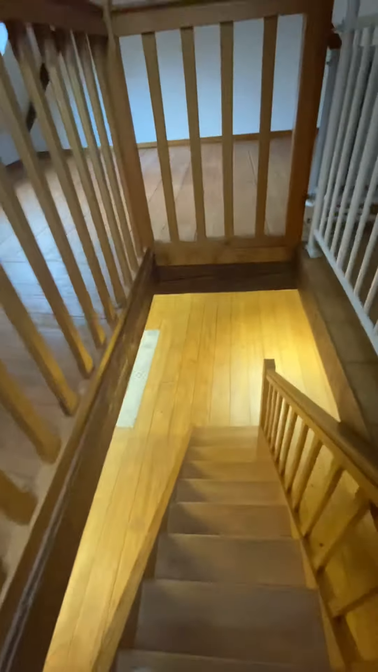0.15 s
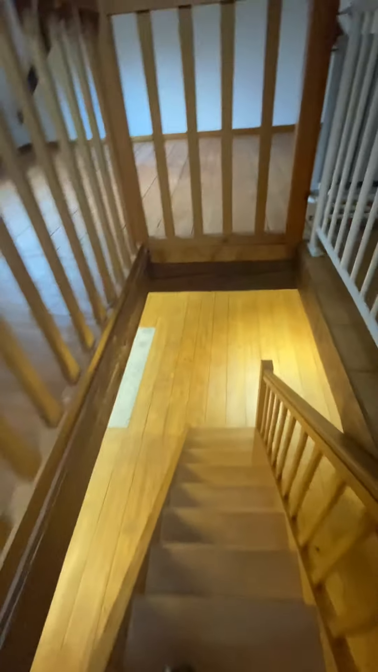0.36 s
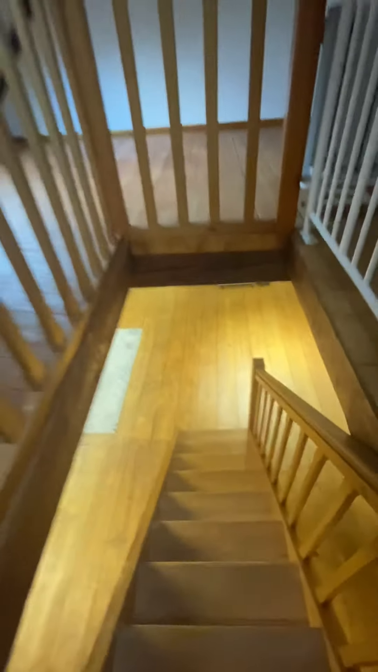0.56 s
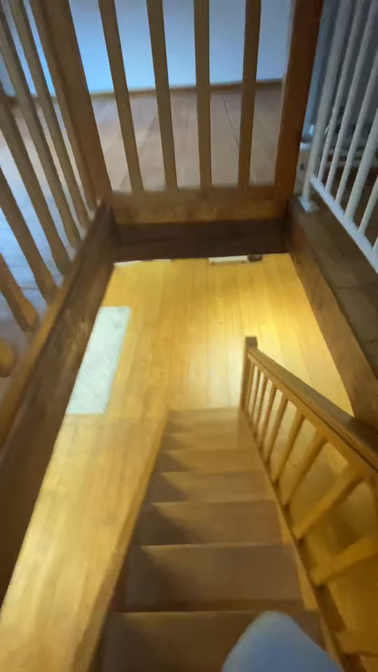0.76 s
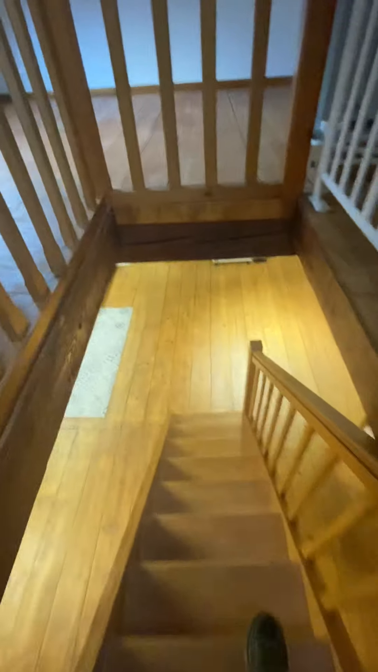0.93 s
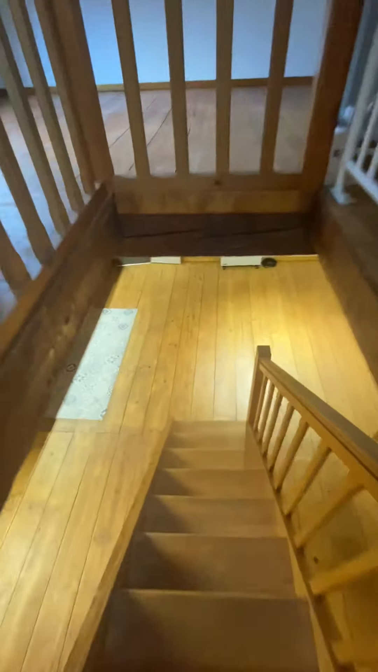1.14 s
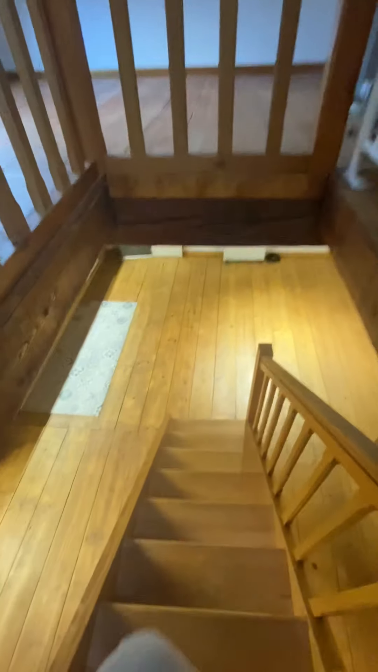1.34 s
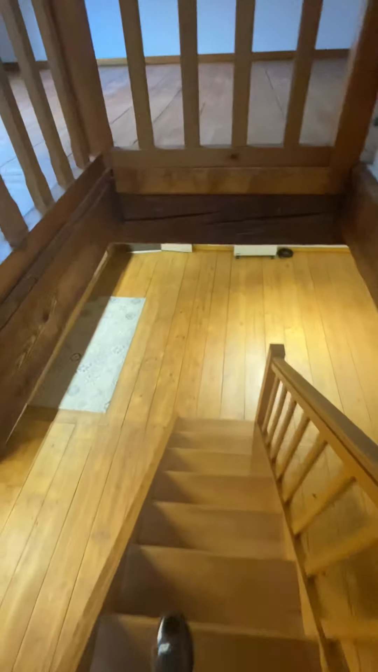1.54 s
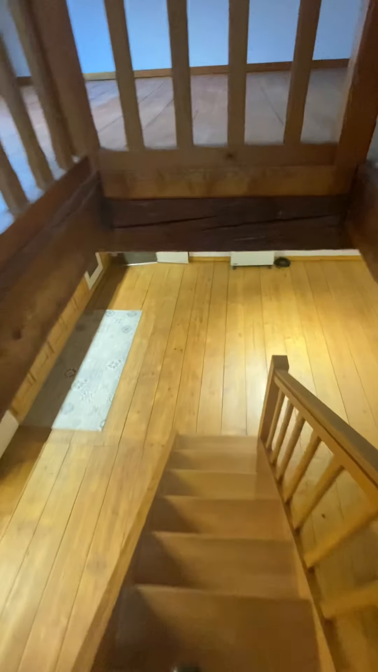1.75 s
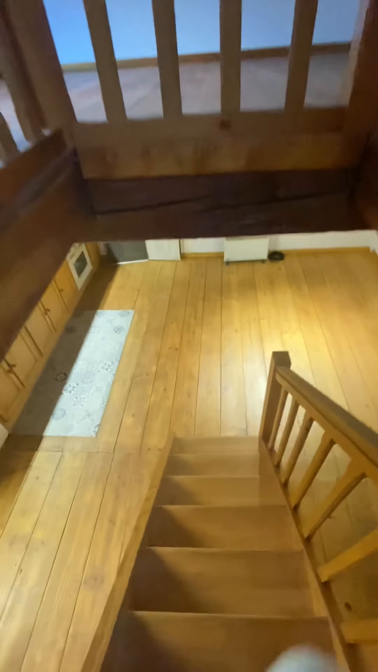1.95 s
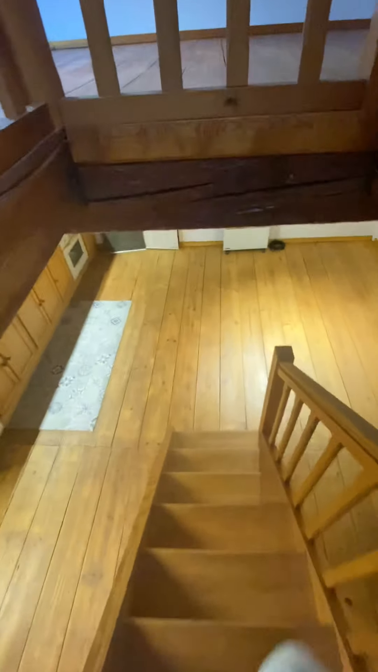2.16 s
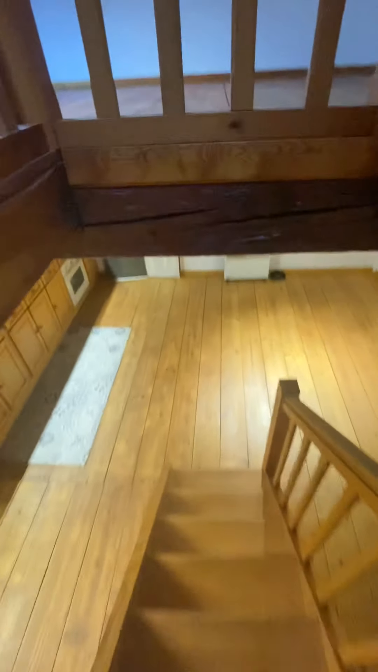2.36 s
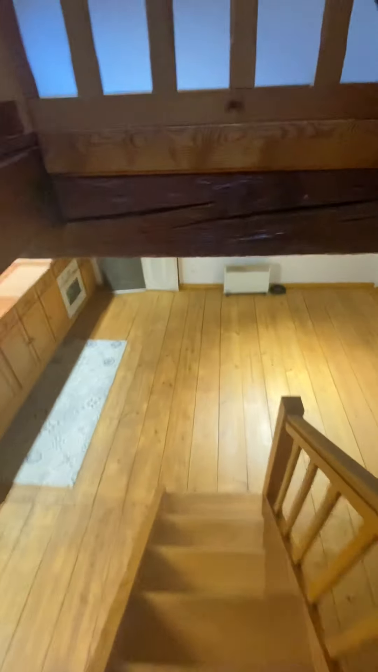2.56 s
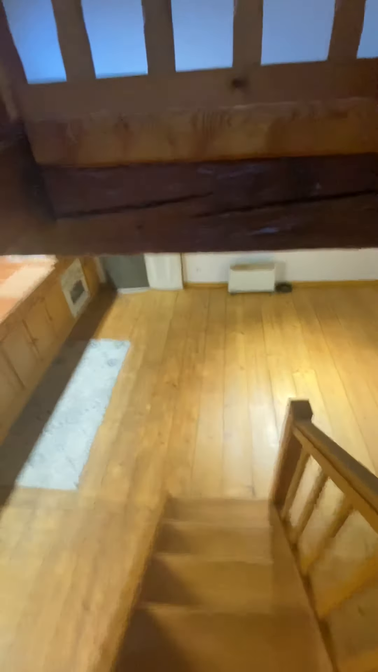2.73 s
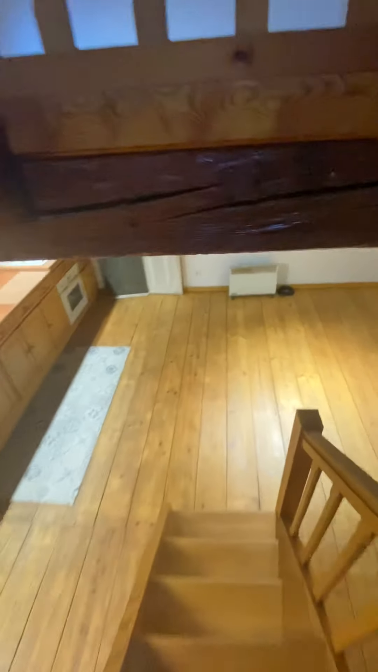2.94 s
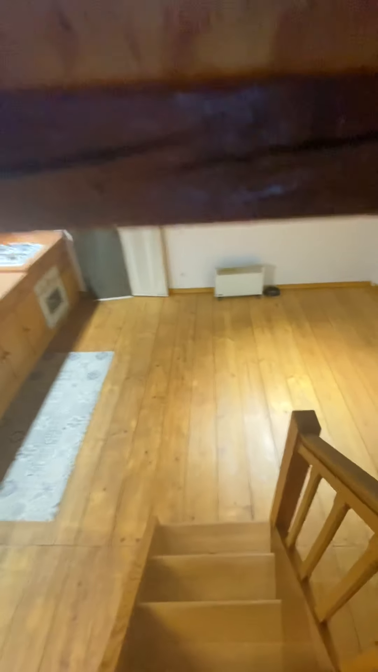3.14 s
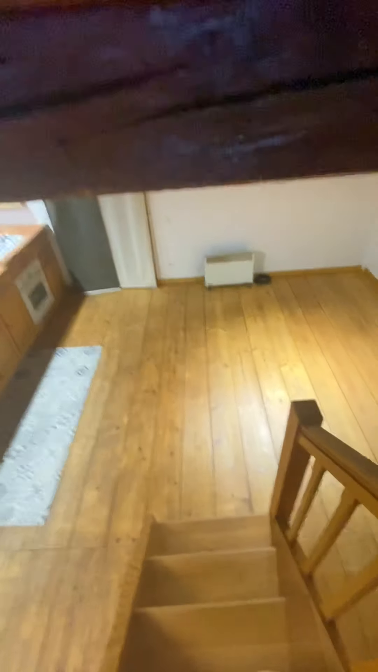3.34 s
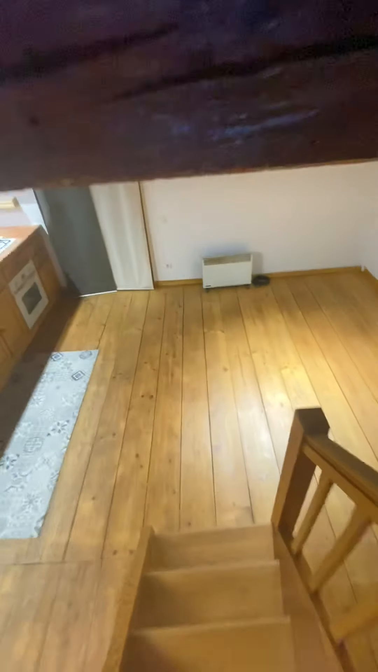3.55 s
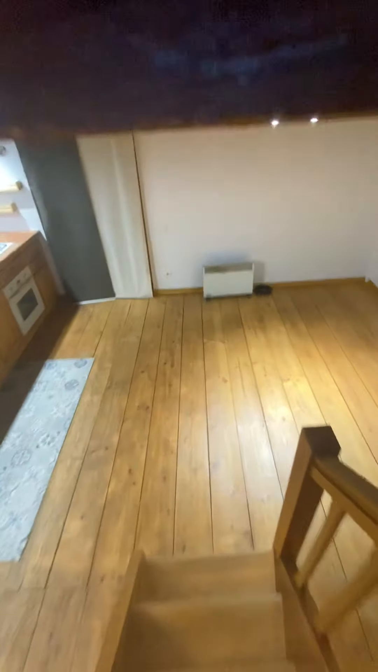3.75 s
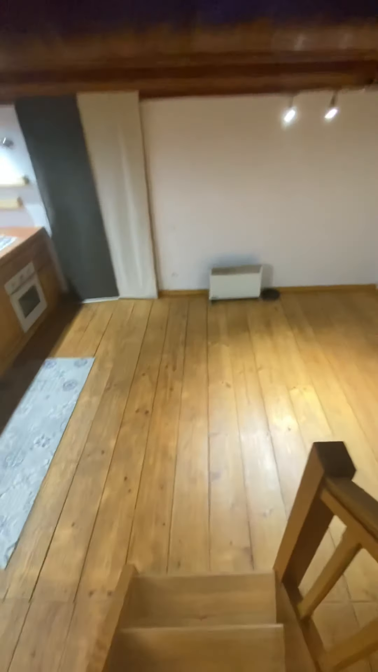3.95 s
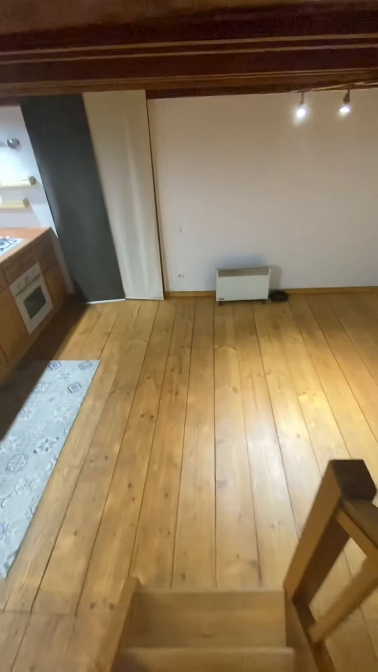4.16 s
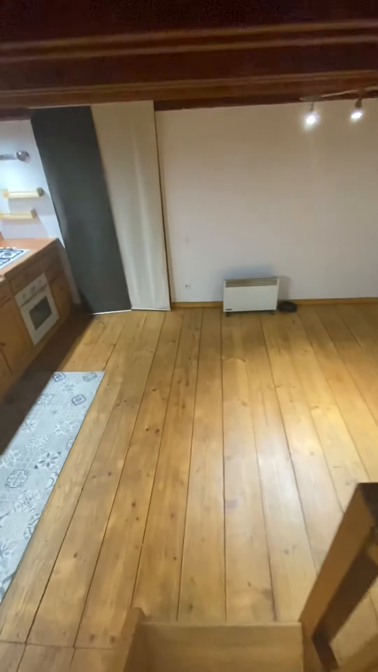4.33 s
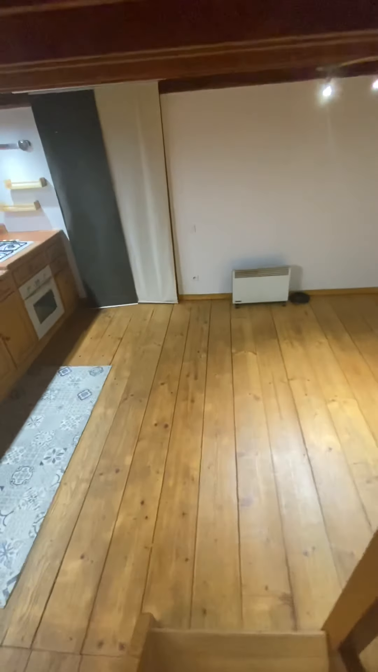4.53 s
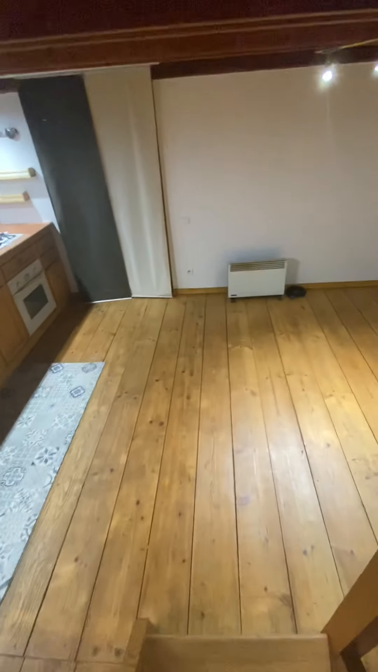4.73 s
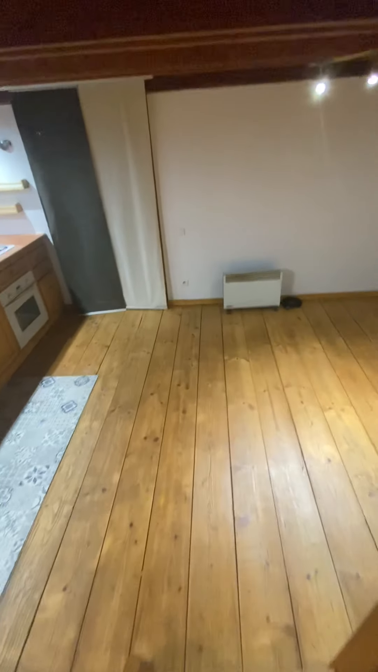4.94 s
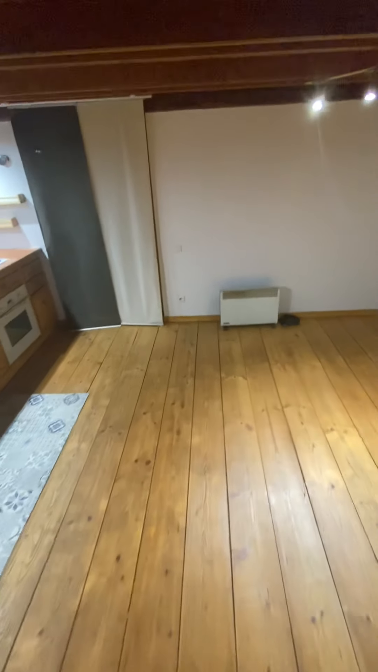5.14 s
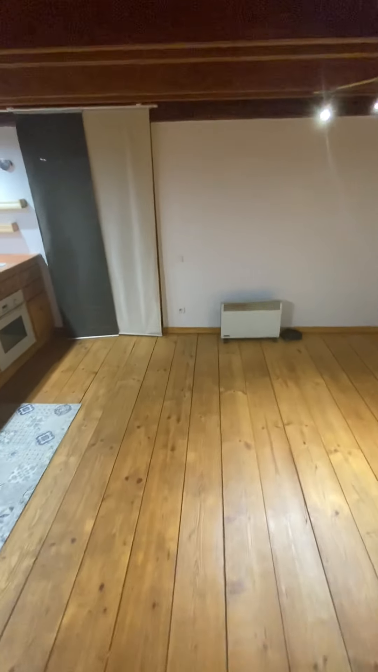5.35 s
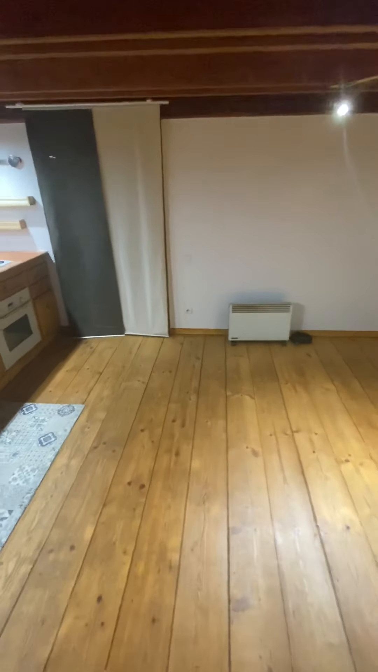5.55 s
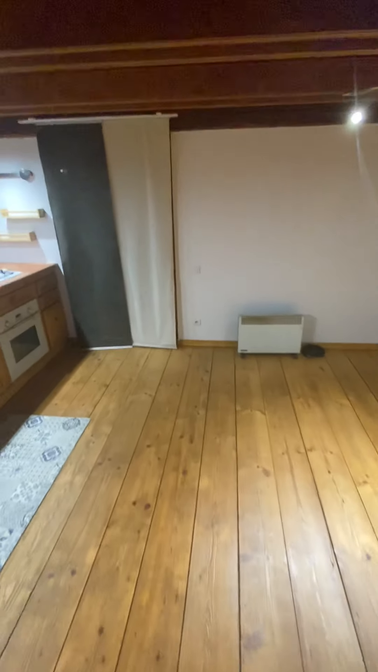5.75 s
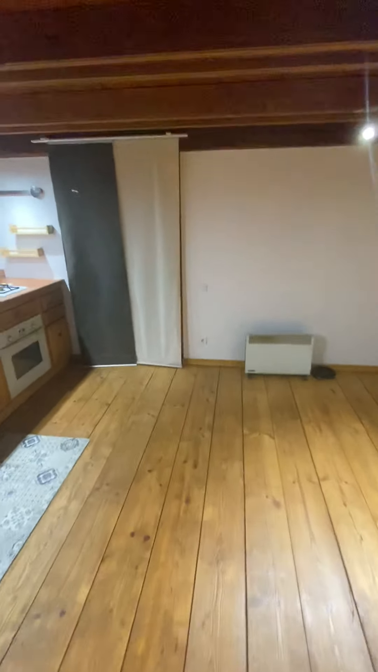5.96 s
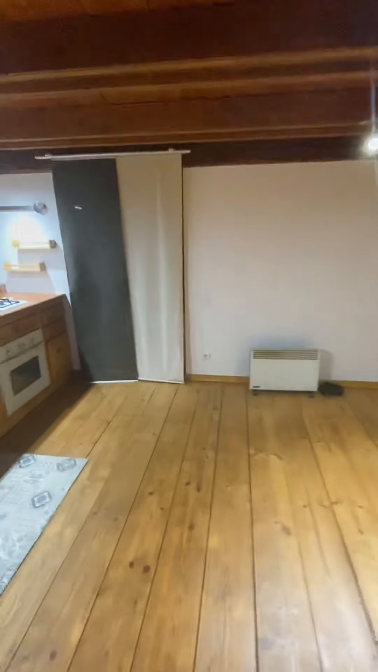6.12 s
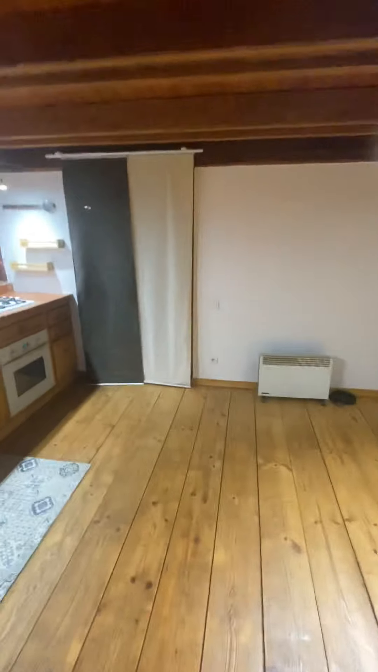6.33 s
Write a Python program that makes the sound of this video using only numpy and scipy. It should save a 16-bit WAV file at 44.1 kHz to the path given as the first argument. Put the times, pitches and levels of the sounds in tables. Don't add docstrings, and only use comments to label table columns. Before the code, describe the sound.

Slow, heavy but soft-soled footsteps go down hollow wooden stairs, a little over half a second apart. Thumps vary from tread to tread, with muffled knocks and a slight deep sway of the staircase. Close to the handheld microphone, fabric rustles softly and small wood or sole clicks appear. A bare living space rings briefly after each thud; finally the walker reaches the floorboards and stops.

```python
import sys
import numpy as np
from scipy import signal
from scipy.fft import rfft, irfft
from scipy.io import wavfile

SR = 44100
rng = np.random.default_rng(int(sys.argv[2]) if len(sys.argv) > 2 else 0)


def master(y):
    cut = np.clip(np.atleast_2d(y).T, -1, 1)
    pcm = np.round(cut * 32767)
    wavfile.write(sys.argv[1], SR, pcm.astype(np.int16))


def ratio_of_db(decibels):
    return 10 ** (np.asarray(decibels, float) / 20)


N = 286209
SPAN = SR
FFT_SIZE = 4 * SPAN // 3

ARRIVAL_TIMES = [.45, 1.05, 1.6, 2.4, 3.05, 3.68, 4.15, 5.1, 5.88]
# (frequency [Hz], width [Hz], level [dB])
HIGH_STAIRS = [
    [(114.6, 32, 2), (425, 58, -6.5), (722, 11, -22), (886, 61, -24), (1020, 155, -3.5)] + [(211, 31, -1), (281, 37, -7.5), (543, 140, 7.5)],
    [(138.0, 16, 1.5), (342.3, 16.0, -13.5), (1200, 92, -60)] + [(212, 62, -4), (445, 65, -12), (569, 19, -21), (780, 54, -53)],
    [(142.0, 30.4, 3.5), (398, 41, -20.5), (600, 50, -17.5), (832, 9.8, -38.5), (1210, 58, -34.5)] + [(298, 68, -15.0), (95, 28, -7.5)],
    [(151.4, 68, 0), (405.3, 17.3, -11.5), (586, 39.0, -3.0)] + [(255, 51, -7), (660, 20, -23), (920, 50, -56.5), (1297, 39, -23.5)],
    [(142.6, 54, -4.5), (779, 35, -26.0), (1147, 102, -18.0)] + [(192, 58, -16.5), (334, 34, -32.0), (452, 102, -3.0), (585, 51, -13.5)],
]
LOW_STAIRS = [
    [(136, 21, -2.5), (444, 116, -1.5), (867, 44, -14), (1215, 96, -16.5)] + [(197.0, 82, -4.5), (310, 30, -29.0), (563, 12, -18)],
    [(130.5, 39.0, 0.5), (444, 58, -6.0), (636, 27, -14.5), (964, 32.0, -17.5)] + [(209, 37, -14.5), (313.6, 29, -12.5), (509, 46, -7.0)],
    [(122.0, 79, 1), (449, 26, -0.5), (650, 41, 1.5), (1061, 22, -12.5)] + [(212.0, 77, -3.5), (286, 75, 7), (773.0, 26.6, -2), (834, 33, -11.5), (1196, 44, -11.5), (1500, 25, -19), (1934, 58, -15)],
]
BOARDS = [
    [(123.6, 51, -4), (593, 78, 14.0), (754, 28, 5.0), (1071, 17, -14.5), (1201, 8.8, -10.0)] + [(244, 37, -1.0), (368, 78, -18), (634, 16, -8.0), (840, 32, -20)],
    [(127.4, 31, 0), (428, 35, -2.0), (646, 29, -41), (900, 40, -21)] + [(180, 101, -2.5), (253, 48, 0)],
]
TREADS = HIGH_STAIRS + LOW_STAIRS + BOARDS


def rms_one(x):
    return x / np.sqrt(np.mean(x ** 2) + 1e-20)


def at_hz(points, hz, order=1):
    points = np.array(points)
    return np.interp(np.log(hz), np.log(points[:, 0]), points[:, order])


def drift(rate_hz):
    r = np.exp(-2 * np.pi * rate_hz * 40 / SR)
    chance = rng.standard_normal(N // 40 + 2002)
    slow = signal.lfilter([1], [1, -2 * r, r * r], chance)[2000:]
    return np.interp(np.arange(N) / 40, np.arange(len(slow)), rms_one(slow))


def band_noise(low_hz, high_hz, noise):
    return signal.sosfilt(signal.butter(2, [low_hz, high_hz], "band", fs=SR, output="sos"), noise)


def bands(size, low_hz, high_hz, likeness, order):
    edges = low_hz * 2 ** np.arange(0, np.log2(high_hz / low_hz) + .01, .5)
    white = rng.standard_normal((2, 2, size))
    for k, (low, high) in enumerate(zip(edges, edges[1:])):
        mid, side = band_noise(low, high, white[k % 2])
        centre_hz = np.sqrt(low * high)
        alike = np.clip(at_hz(likeness, centre_hz, order=order), 0, 1)
        yield centre_hz, np.sqrt(1 + alike) * mid + np.sqrt(1 - alike) * side * [[1], [-1]]


def room(build_s=0.002):
    # (frequency [Hz], time to fall 60 dB [s], echo level re direct sound [dB], left-right likeness [0-1])
    house = [(39.2, 2.7, -4.5, 0.86), (126, 0.52, -5.5, 1), (322, 0.59, 2, 1), (647, 0.57, -2.5, 0.09),
             (1620, 0.77, 2.5, 0.39), (3730, 0.69, 1.5, 0.088), (9300, 1.26, -0.5, 0.6)]
    t = np.arange(SPAN) / SR
    echoes = 0
    for hz, noise in bands(SPAN, 30, 16000, house, order=3):
        t60 = at_hz(house, hz)
        fading = ratio_of_db(at_hz(house, hz, order=2) - 60 * t / t60)
        echoes = echoes + noise * fading / np.sqrt(t60 * SR / 14)
    echoes *= 1 - np.exp(-t / build_s)
    return rfft(echoes, FFT_SIZE)


def add(out, sound, echoes, s, peak_db, pan_db, wet_db):
    wet = irfft(rfft(sound, FFT_SIZE) * (1 + ratio_of_db(wet_db) * echoes))[:, :SPAN]
    wet *= ratio_of_db(peak_db + pan_db / 2 * np.array([[1], [-1]])) / np.abs(wet).max()
    start = max(round(s * SR), 0)
    out[:, start:start + SPAN] += wet[:, :N - start]


def struck(modes, rise_s, damping):
    t = np.arange(SR // 3) / SR
    luck = rng.standard_normal((2, 14))
    rings = np.zeros_like(t)
    for (hz, width_hz, db), spread, side in zip(modes, *luck):
        decay = np.exp(-np.pi * damping * max(width_hz, 18) * t)
        strength = ratio_of_db(db + 0.94 * spread) * np.sqrt(width_hz) * np.sign(side)
        rings += strength * decay * np.sin(2 * np.pi * hz * t)
    return rings * (1 - np.exp(-t / max(rise_s, 1e-4))) ** 2


def burst(low_hz, high_hz, rise_s, decay_s, apart):
    t = np.arange(SR // 10) / SR
    shared, own = rng.standard_normal((2, 2, len(t)))
    noise = (shared[0] + apart * own) * np.exp(-t / decay_s) * (1 - np.exp(-t / rise_s))
    puff = band_noise(low_hz, min(high_hz, .45 * SR), noise)
    return puff / np.abs(puff).max()


def contacts():
    # (time [s], peak level [dB], knock re thump [dB], scuff level [dB], press time [s])
    landings = [(0.001, -21.5, -14, -51.5, 0.0059), (0.476, -17.5, -13.5, -46.5, 0.0052),
                (1.094, -24, -6, -52.5, 0.024), (1.776, -21, -8.5, -49, 0.011),
                (2.417, -26, -12.5, -54, 0.015), (3.08, -19, -13.5, -48.5, 0.0017),
                (3.698, -13, -15, -51, 0.025), (4.167, -34.5, -10, -56.5, 0.0036),
                (4.367, -28, -5, -44.5, 0.022), (5.125, -24, -5, -65, 0.011),
                (5.907, -24.5, -10, -61.5, 0.01)]
    # (time [s], peak level [dB], knock re thump [dB], press time [s])
    heel_rolls = [(0.557, -25.5, -14.5, 0.0033), (1.123, -15.5, -17.5, 0.0082),
                  (1.285, -27.5, -16.5, 0.0094), (1.783, -13, -12, 0.021), (1.915, -28, -10.5, 0.008),
                  (1.954, -27.5, -18, 0.013), (2.443, -19.5, -19.5, .016), (2.475, -23.5, -19, 0.015),
                  (2.556, -20, -16.5, 0.0045), (2.579, -20.5, -25, .012), (3.114, -15.5, -23.5, 0.0042),
                  (3.213, -20.5, -15, 0.0033), (3.234, -33, -14, .0062), (3.88, -29.5, -15.5, 0.013),
                  (4.377, -15, -9, 0.0079), (4.391, -22.5, -12, 0.014), (5.133, -17.5, -5, 0.0074),
                  (5.179, -25.5, -13.5, 0.003), (5.924, -20.5, -16.5, 0.014), (5.976, -22.5, -18, 0.0096)]
    # (time [s], peak level [dB], knock re thump [dB])
    foot_stirs = [(0.284, -49, 2), (0.379, -38, -40), (1.662, -37.5, -10.5), (2.125, -50.5, -1),
                  (2.63, -46, -25), (2.75, -41.5, -22), (5.638, -51, -18), (6.154, -55, -18)]
    rolls = [(s, db, knock_db, db - 35, press_s) for s, db, knock_db, press_s in heel_rolls]
    stirs = [(s, db, knock_db, db - 38, 0.014) for s, db, knock_db in foot_stirs]
    return sorted(landings + rolls + stirs)


def footsteps(rooms):
    split_hz = 240
    out = np.zeros((2, N))
    for s, db, knock_db, scuff_db, press_s in contacts():
        tread = np.searchsorted(ARRIVAL_TIMES, s)
        low_modes = [m for m in TREADS[tread] if m[0] < split_hz]
        high_modes = [m for m in TREADS[tread] if m[0] >= split_hz]
        thump = struck(low_modes, 0.78 * press_s, damping=1.12)
        knock = struck(high_modes, 0.51 * press_s, damping=1.83)
        knock = np.tile(knock / np.abs(knock).max(), (2, 1))
        knock[:, :SR // 10] += ratio_of_db(-5.0) * burst(297, 676, 0.0073, 0.011, apart=0.72)
        knock[:, :SR // 10] += ratio_of_db(-24) * burst(1100, 2300, 0.0045, 0.018, apart=0.78)
        scuff_hz = 1784 + 23800 * press_s
        slap = burst(0.77 * scuff_hz, 1.34 * scuff_hz, 0.0026, 0.0031 + 0.23 * press_s, apart=1.76)
        scuff = slap + ratio_of_db(-20.5) * burst(2200, 8500, 0.0012, 0.0073, apart=0.62)
        add(out, thump, rooms[tread], s, db - 6, 0, wet_db=3.0)
        add(out, knock, rooms[tread], s, db + knock_db + 6, 0, wet_db=0.7)
        add(out, scuff, rooms[tread], s - .0025, scuff_db + 11.5, 0, wet_db=-6.5)
    return out


def sway():
    # (frequency [Hz], level re contact [dB], swell time [s])
    stair_modes = [(44.3, -37.5, 0.1), (60, -38, 0.044)]
    pushes = np.zeros(N)
    for s, db, *_ in contacts():
        pushes[round(s * SR)] = ratio_of_db(db)
    t = np.arange(SR // 2) / SR
    modes = np.zeros_like(t)
    for hz, db, swell_s in stair_modes:
        swell = t / swell_s * np.exp(1 - t / swell_s)
        modes += ratio_of_db(db) * swell * np.sin(2 * np.pi * hz * t)
    return signal.fftconvolve(pushes, modes)[:N]


def hiss(spectrum, patchy_db, rate_hz):
    # (frequency [Hz], likeness [0-1])
    port_likeness = [(40, 0.68), (150, 0.97), (500, 0), (2000, 0.54), (4500, 0.76), (6500, 0.55),
                     (9000, 0.9), (10500, 1), (16000, 0.95)]
    together = drift(rate_hz / 3)
    low_hz, high_hz = spectrum[0][0], min(spectrum[-1][0] * 1.2, .45 * SR)
    total = 0
    for hz, noise in bands(N, low_hz, high_hz, port_likeness, order=1):
        flicker_db = patchy_db * (together + drift(rate_hz))
        total = total + ratio_of_db(at_hz(spectrum, hz) + flicker_db) * noise
    return rms_one(total)


def swells(s, peak_db, calm_db, rise_db_per_s, fall_db_per_s):
    late = np.arange(0, N + 64, 64)[:, None] / SR - s
    each = peak_db + np.where(late < 0, rise_db_per_s * late, -fall_db_per_s * late)
    total_db = 10 * np.log10(ratio_of_db(2 * calm_db) + ratio_of_db(2 * each).sum(axis=1))
    return np.interp(np.arange(N) / 64, np.arange(len(total_db)), total_db)


def background():
    # (time [s], rumble level [dB], sole drag level [dB])
    loads = [(0.02, -39, -49), (0.68, -39.5, -54.5), (1.14, -49, -59.5), (1.55, -73, -58.5),
             (1.92, -42, -48), (2.62, -57, -53.5), (3.28, -43, -50), (3.89, -49, -61), (4.23, -47.5, -64),
             (4.55, -57, -53.5), (5.3, -45, -52.5), (5.8, -57, -61.5), (6.02, -52, -61.5),
             (6.17, -59.5, -64.5)]
    # (time [s], level [dB])
    swings = [(0.0, -58.5), (0.56, -56.5), (1.17, -58.5), (1.72, -60), (2.58, -61.5), (3.25, -58),
              (3.74, -54.5), (4.43, -53.5), (5.12, -52.5), (5.751, -68), (6.05, -63.5)]
    # (frequency [Hz], level per Hz [dB])
    rumble_colour = [(12, -17), (20, -14.5), (102, 10), (125, 9), (189, -28), (231, -5), (300, 5),
                     (390, -51), (660, -120)]
    shuffle_colour = [(120, -38), (200, -2), (311, 1), (472, -0.5), (695, -5.5), (1370, -13), (2600, -18.5),
                      (3380, -52), (5720, -120)]
    rustle_colour = [(1500, -18), (2200, -0.5), (3000, -3), (4000, -9), (5200, -3.5), (6300, 2), (7200, -5),
                     (9000, -13), (12000, -18), (14000, -15), (16000, -5)]
    s, rumble_db, drag_db = np.transpose(loads)
    rumble_db = swells(s, rumble_db, calm_db=-63, rise_db_per_s=76, fall_db_per_s=60)
    shuffle_db = swells(s, drag_db, calm_db=-78, rise_db_per_s=48.5, fall_db_per_s=41.5)
    rustle_db = swells(*np.transpose(swings), calm_db=-68, rise_db_per_s=29.5, fall_db_per_s=34.5)
    rumble = ratio_of_db(rumble_db) * hiss(rumble_colour, patchy_db=-2.5, rate_hz=1)
    shuffle = ratio_of_db(shuffle_db) * hiss(shuffle_colour, patchy_db=.8, rate_hz=12)
    rustle = hiss(rustle_colour, patchy_db=1.3, rate_hz=4.9)
    dull = signal.sosfilt(signal.butter(2, 7000, fs=SR, output="sos"), rustle)
    bright = np.clip((rustle_db + 69.5) / 8, 0, 1)
    clothes = ratio_of_db(rustle_db) * (bright * rustle + (1 - bright) * dull)
    stop_s, settle_s, still_db = 6.19, 0.084, -7.5
    still = ratio_of_db(still_db * np.clip((np.arange(N) / SR - stop_s) / settle_s, 0, 1))
    return rumble + still * (shuffle + clothes)


def ticks(rooms):
    # (time [s], peak level [dB], pitch [Hz], bright edge level [dB], room level [dB])
    snaps = [(.669, -44, 2910, -13, -5.5), (1.061, -50, 3230, -15, -16), (1.103, -47, 5000, -5, -10),
             (1.176, -26, 2700, -4, -13), (1.784, -32.5, 5200, -5, 1.5), (2.167, -53, 2900, -4, -13),
             (2.419, -40.5, 5300, -9.5, 0), (2.5088, -28.5, 5100, -21, -8), (2.5104, -25, 3190, -16, -8.5),
             (2.752, -67, 3000, -10, -15), (3.08, -65, 5030, -3, -10), (4.015, -51.5, 5300, -10, -24.5),
             (4.377, -41, 2750, -16, -11), (6.041, -43, 2300, -21, 2), (6.2745, -49.5, 3270, -3, -12),
             (6.426, -52, 1900, -17.5, -2)]
    out = np.zeros((2, N))
    for s, db, hz, edge_db, wet_db in snaps:
        snap = burst(.76 * hz, 1.22 * hz, .0003, .0016, apart=1.1)
        snap = snap + ratio_of_db(edge_db) * burst(6500, 15000, .0002, .0015, apart=.6)
        add(out, snap, rooms[np.searchsorted(ARRIVAL_TIMES, s)], s, db, 0.5, wet_db)
    return out


def scene():
    rooms = [room() for tread in TREADS]
    return footsteps(rooms) + ticks(rooms) + sway() + background()


def roll_off(x):
    return signal.sosfilt(signal.butter(12, 16820, fs=SR, output="sos"), x)


def record(dry):
    # (frequency [Hz], width [Hz], level [dB])
    port_dips = [(6830, 530, -7), (13870, 760, -2.5)]
    lag_s, left_db = 0.000187, 0.63
    hz = np.arange(N // 2 + 1) * SR / N
    colour = ratio_of_db(sum(db * np.exp(-((hz - dip_hz) / width_hz) ** 2) for dip_hz, width_hz, db in port_dips))
    lag = np.array([ratio_of_db(left_db) * np.exp(-2j * np.pi * hz * lag_s), np.ones_like(hz)])
    ports = irfft(rfft(dry) * colour * lag, N)
    ports = signal.sosfilt(signal.butter(2, 35, "high", fs=SR, output="sos"), ports)
    ports = signal.sosfilt(signal.cheby2(12, 60, 16400, fs=SR, output="sos"), ports)
    return roll_off(ports)


dry = scene()
out = record(dry)
master(out)
```